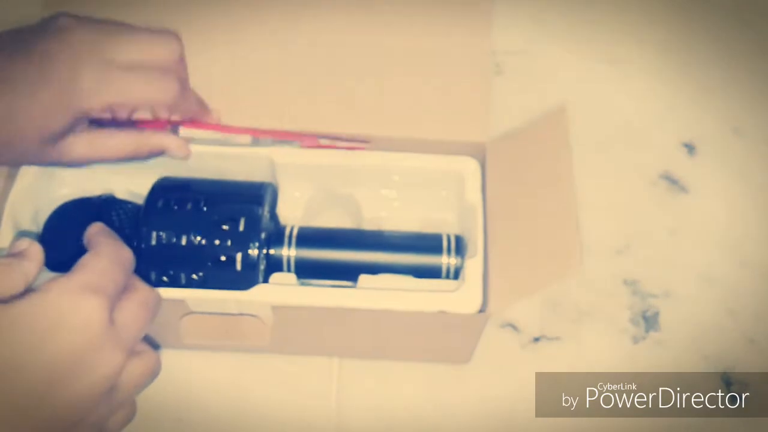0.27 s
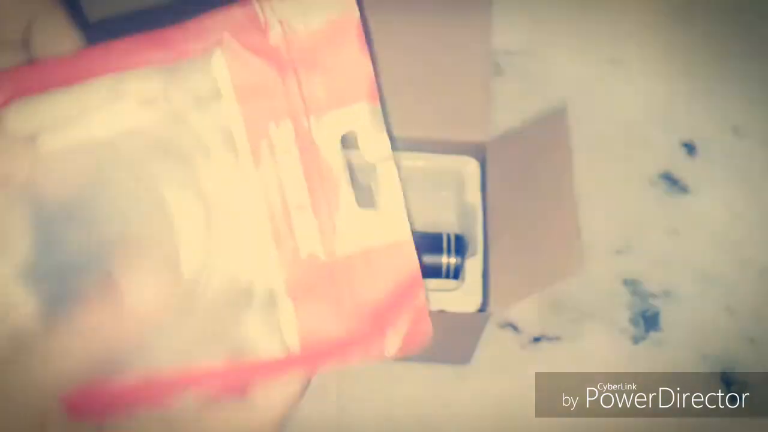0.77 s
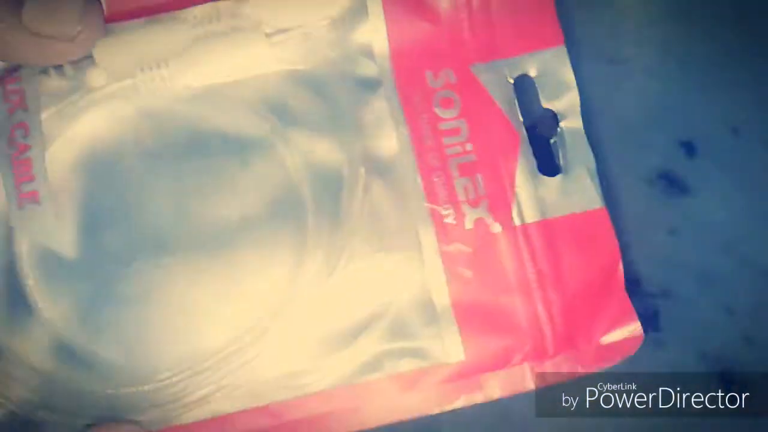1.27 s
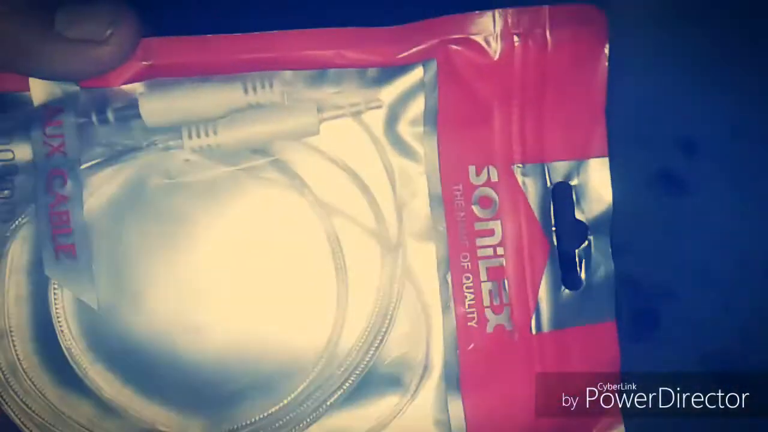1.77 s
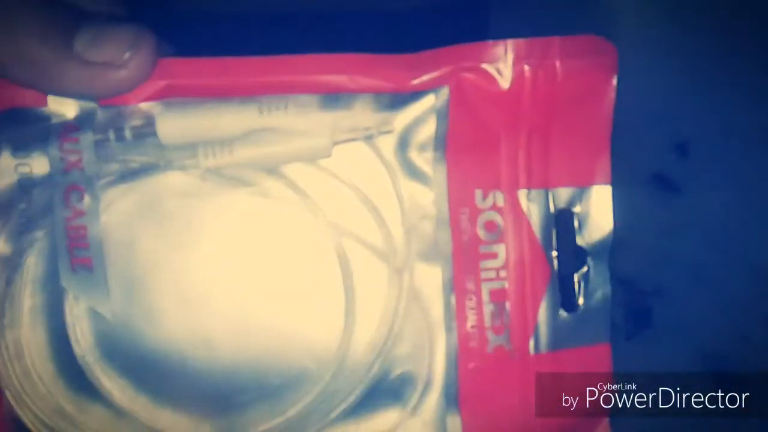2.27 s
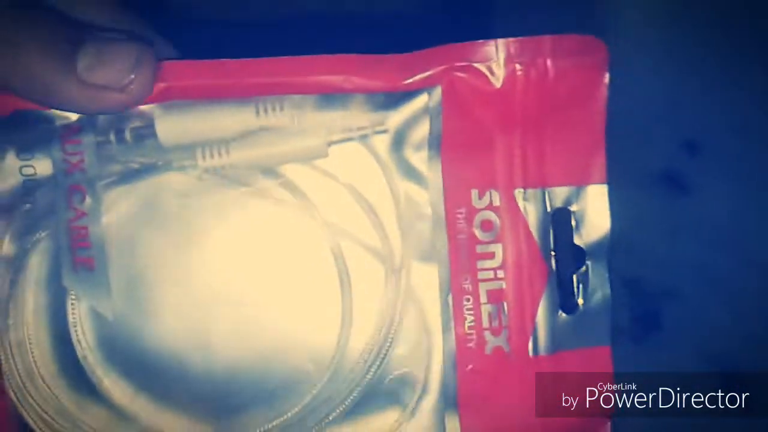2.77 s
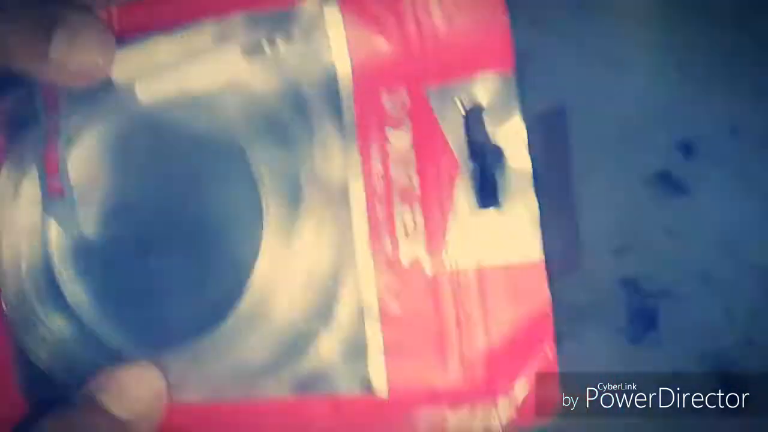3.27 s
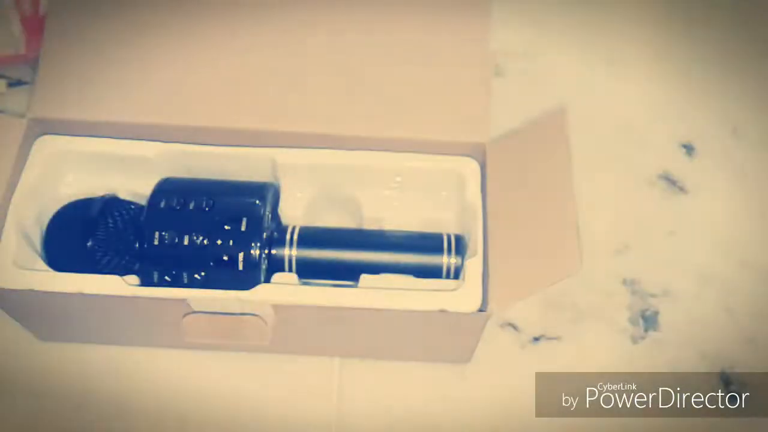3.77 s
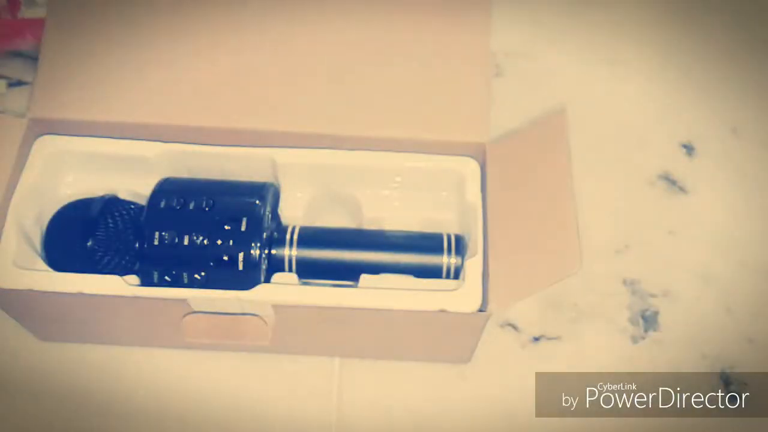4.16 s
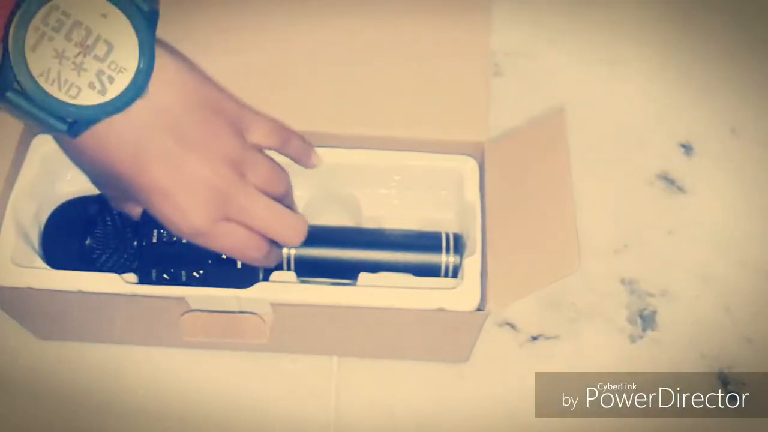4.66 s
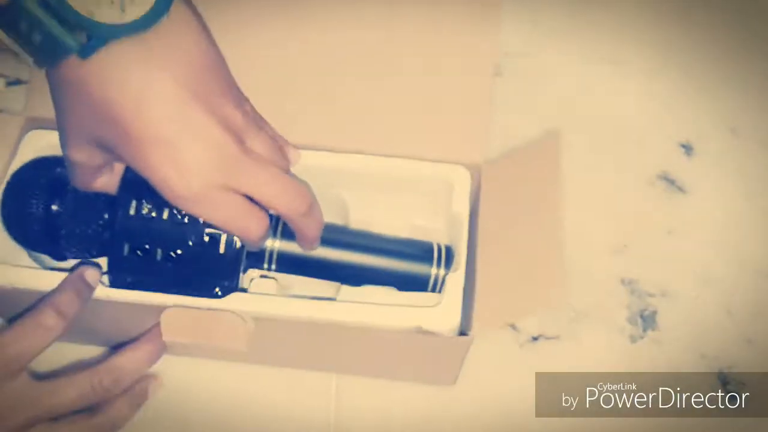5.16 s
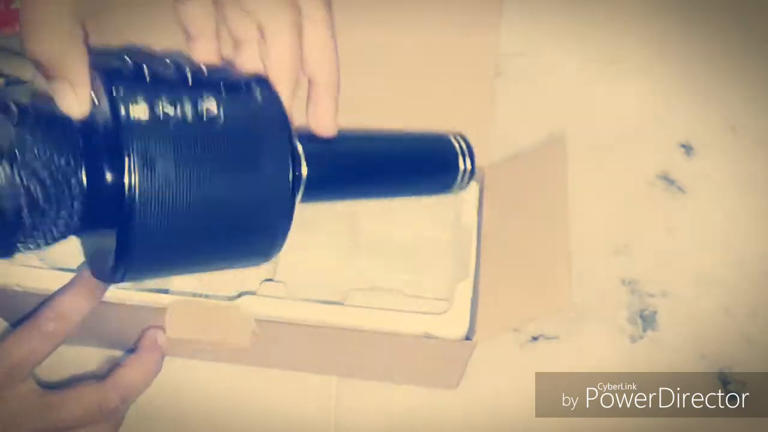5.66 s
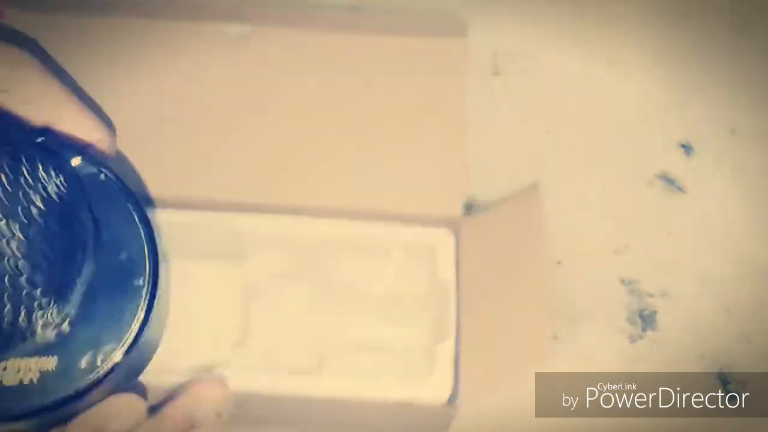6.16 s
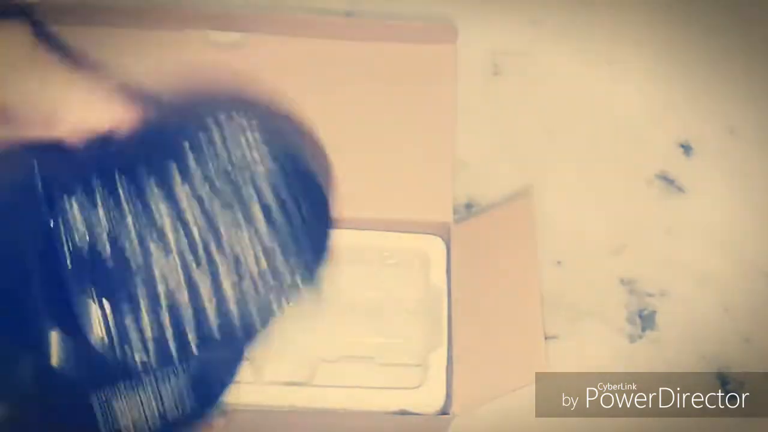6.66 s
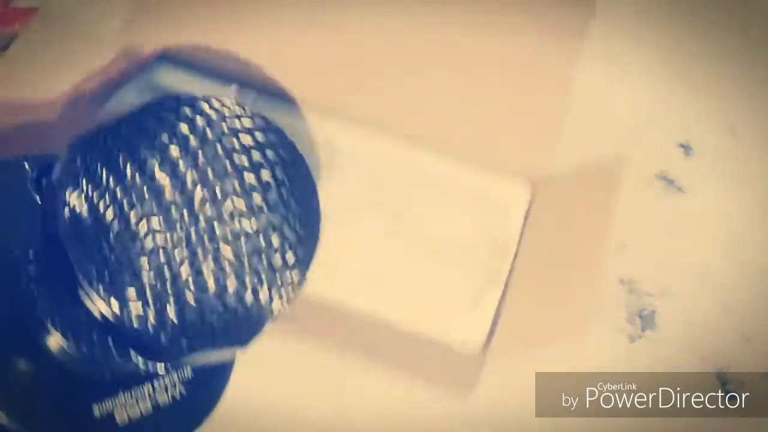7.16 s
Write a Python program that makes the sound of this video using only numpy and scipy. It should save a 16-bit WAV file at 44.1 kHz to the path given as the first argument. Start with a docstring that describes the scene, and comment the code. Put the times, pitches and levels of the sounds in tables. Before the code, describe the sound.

Close to a phone microphone in a small hard room, a double knock on a box leads into a papery slide and a sharp foil snap. A pouch crinkles and ticks, then nearly stops. After a few faint rustles, a handheld microphone drags roughly from its plastic tray, with clacks and crackles. The empty box drops with loud hollow knocks, is nudged, and scrapes over the stone floor.

```python
"""Unboxing on a stone floor, close to a phone: after a knock, a foil pouch slides off a cardboard lid (grainy noise).
Held up, it snaps and crinkles as it flexes: bright cracks, a few cycles of ringing panel, small pitched ticks.
A handheld microphone is pulled from its moulded plastic tray (coarser grains that set tray and box humming).
The box drops back, is nudged and scrapes along: struck modes of walls and tray, then rubbing noise.
Throughout, a small hard room answers with decaying noise, over a low rumble and a thin whine."""
import sys
import numpy as np
from scipy import signal
from scipy.fft import rfft, irfft, next_fast_len
from scipy.io import wavfile
from scipy.ndimage import map_coordinates

SR = 44100
rng = np.random.default_rng(int(sys.argv[2]) if len(sys.argv) > 2 else 0)


def inscribe(sig):
    """Save sig as 16-bit PCM at rate SR to the path in sys.argv[1].

    A 1-D sig is mono; a 2-D sig holds one channel per row.
    Samples are clipped to [-1, 1] before scaling.
    """
    pcm = np.round(np.clip(np.atleast_2d(sig).T, -1, 1) * 32767)
    wavfile.write(sys.argv[1], SR, pcm.astype(np.int16))


N = 327513  # samples
TOP_HZ = 15700  # upper band limit


def amp(db):
    """Decibels to gain."""
    return 10 ** (np.asarray(db) / 20)


def unit(x):
    """Scale to rms 1."""
    return x / np.sqrt(np.mean(x ** 2) + 1e-20)


def burst(x):
    """Scale to rms 1 over the first 10 ms."""
    return x / np.sqrt(np.mean(x[:SR // 100] ** 2) + 1e-20)


def along(points, hz):
    """Interpolate (Hz, value) points on a log frequency axis."""
    f, v = np.transpose(points)
    return np.interp(np.log(hz + 1), np.log(f + 1), v)


def wobble(knots_per_s):
    """Smooth random curve through Gaussian knots."""
    knots = rng.standard_normal(int(N * knots_per_s / SR) + 4)
    return map_coordinates(knots, [np.arange(N) * knots_per_s / SR])


def coloured(x, gain):
    """Causal minimum-phase filter of magnitude gain(Hz), by folding the cepstrum."""
    m = 2 * next_fast_len(len(x) // 2 + 4096)
    magnitude = np.maximum(gain(np.fft.rfftfreq(m, 1 / SR)), 1e-6)
    cepstrum = irfft(np.log(magnitude), m)
    cepstrum[1:m // 2] *= 2
    cepstrum[m // 2 + 1:] = 0
    response = np.exp(rfft(cepstrum, m))
    return irfft(rfft(x, m) * response, m)[:len(x)]


def high_pass(x, hz):
    """Second-order bass cut."""
    return signal.sosfilt(signal.butter(2, hz, "high", fs=SR, output="sos"), x)


def add(track, s, sound):
    """Mix a sound into a track at time s."""
    part = track[max(round(s * SR), 0):][:len(sound)]
    part += sound[:len(part)]


def ring(modes, t, scatter_db):
    """Damped modes (Hz, dB, t60 s); every strike draws new strengths and signs."""
    hz, db, t60 = np.transpose(modes)[:, :, None]
    chance = rng.standard_normal((2, len(modes), 1))
    size = np.sign(chance[0]) * amp(db + scatter_db * chance[1])
    decay = np.exp(-np.log(1000) * t / t60)
    return burst(np.sum(size * decay * np.sin(2 * np.pi * hz * t), axis=0))


# Spectrum of a contact crack. Each row: frequency in Hz, relative level in dB.
CRACK = [(1200, -43.5), (2600, 4), (4300, 2.5), (5600, 0.5), (7000, 2), (10000, -22), (15000, -23.5)]


def crack(t, t60, sharp_db, spike=4.8):
    """Bright spit of a contact, spike plus noise puff; a harder edge keeps more of the highest treble."""
    puff = rng.standard_normal(len(t)) * np.exp(-np.log(1000) * t / t60)
    puff[0] = spike
    edge = [(4000, 0.013), (7000, sharp_db)]  # Hz, dB
    return burst(coloured(puff, lambda hz: amp(along(CRACK, hz) + along(edge, hz))))


# Creases of foil and plastic snapping over.
# Each row: start in seconds, panel level in dB, panel pitch in Hz, crack level in dB, sharpness in dB.
SNAPS = [(.47, -37.5, 1290, -32, 2), (.7363, -43.5, 1310, -48.5, -3), (0.7453, -49, 760, -43, -7.5),
         (0.828, -50, 1090, -53, -2.5), (.939, -41, 760, -50.5, -15), (0.9517, -48.5, 2110, -38, -12),
         (0.9574, -49, 2160, -56, -8), (0.9683, -42, 530, -49.5, 7.5), (0.9796, -48.5, 650, -78, -10),
         (1.0031, -48.5, 1290, -49.5, -1), (1.057, -53, 1200, -58, -8.5), (1.1538, -43, 1810, -58, -8),
         (1.216, -63, 1130, -61.5, -3), (1.2416, -45, 1080, -52.5, -8.5), (1.2482, -47, 900, -64, -12),
         (1.351, -36.5, 1016, -56.5, -3.5), (1.3535, -39, 820, -56, 5), (1.3948, -55, 840, -84, -4),
         (1.4461, -49, 1230, -66, 1), (1.6194, -63, 2230, -58, -1.5), (1.7066, -43.5, 1770, -59.5, 4),
         (1.857, -44, 1170, -46.5, -21), (2.1421, -41.5, 1010, -50, -15), (3.2684, -54, 587, -73, -4),
         (3.3255, -36.5, 1820, -39, 10), (3.3815, -43.5, 1050, -58.5, 1), (3.9466, -60, 785, -61, 7),
         (4.0463, -57.5, 1210, -59, 6), (4.286, -61.5, 700, -65.5, 7), (4.864, -62, 696, -65, -4),
         (4.9276, -65, 526, -71, 8), (5.2146, -43, 740, -39, 4), (5.237, -52, 845, -45.5, -24.5),
         (5.348, -42, 2210, -36, -8), (6.6876, -78, 2240, -67, 5)]
# Overtones of a snapping panel. Each row: ratio to its pitch, relative level in dB.
PANEL = [(.55, -9), (1, 0.5), (1.451, -7), (2.15, -9)]


def snaps(panel_t60_s=0.012, push_hz=330, low_cut_hz=170):
    """A crease flips: a crack, a few cycles of the panel beside it, a small push of air."""
    push_db, push_db_per_octave = -7, -15.5  # push re panel at 1 kHz; smaller, higher panels push less
    out, t = np.zeros(N), np.arange(SR // 20) / SR
    for s, panel_db, hz, crack_db, sharp_db in SNAPS:
        modes = [(hz * ratio, db, panel_t60_s) for ratio, db in PANEL]
        air_db = panel_db + push_db + push_db_per_octave * np.log2(hz / 1000)
        add(out, s, amp(panel_db) * ring(modes, t, scatter_db=4.0))
        add(out, s, amp(air_db) * ring([(push_hz, 0, .012)], t, scatter_db=0))
        add(out, s, amp(crack_db) * crack(t, t60=0.012, sharp_db=sharp_db))
    return high_pass(out, low_cut_hz)  # small things radiate little bass


def swell(strokes, rise_db_per_s, fall_db_per_s, slow_stroke_s=0.13):
    """Each stroke rises, holds and dies away; one gain curve per level column."""
    now = np.arange(N) / SR
    power = np.zeros((len(strokes[0]) - 2, N))
    for s, held_s, *levels_db in strokes:
        rise = rise_db_per_s / (1 + held_s / slow_stroke_s)  # half the pace when held slow_stroke_s
        away_db = rise * np.maximum(s - now, 0) + fall_db_per_s * np.maximum(now - s - held_s, 0)
        heard = away_db < 60
        power[:, heard] += amp(np.array(levels_db)[:, None] - away_db[heard]) ** 2
    return np.sqrt(power)


def rub(gains, spectrum, catches_per_s, smooth, judder_db, stutter_db, split_hz=2000):
    """Friction: tiny catches of uneven size on a smooth hiss, juddering with the hand."""
    body_gain, hiss_gain = gains
    grains = (rng.random(N) < catches_per_s / SR) * rng.standard_normal(N)
    force = unit(grains) + smooth * rng.standard_normal(N)
    force = force * amp(judder_db * wobble(90))

    def low_share(hz):
        return 1 / (1 + (hz / split_hz) ** 6)

    low = unit(coloured(force, lambda hz: amp(along(spectrum, hz)) * np.sqrt(low_share(hz))))
    high = unit(coloured(force, lambda hz: amp(along(spectrum, hz)) * np.sqrt(1 - low_share(hz))))
    # the grip keeps shifting, separately in each band
    low = unit(low * amp(stutter_db * wobble(35)))
    high = unit(high * amp(stutter_db * wobble(35)))
    return low * body_gain + high * hiss_gain


def crinkle(gains, per_s, crinkle_db, centre_hz=3800, spread=0.53, size_db=4, cycles=5):
    """Little creases give way at random, each with its own pitch, as strongly as the sheet is rubbed."""
    _, hiss_gain = gains
    out, t = np.zeros(N), np.arange(SR // 100) / SR
    starts = np.flatnonzero((rng.random(N) < per_s / SR) & (hiss_gain > 0))
    chances = np.clip(rng.standard_normal((len(starts), 2)), -2, 2)
    for at, (pitch, size) in zip(starts, chances):
        hz = min(centre_hz * np.exp(spread * pitch), TOP_HZ)
        tick = np.sin(2 * np.pi * hz * t) * np.exp(-2 * hz * t / cycles)
        add(out, at / SR, hiss_gain[at] * amp(crinkle_db + size_db * size) * tick)
    return out


# Colour of rubbed foil. Each row: frequency in Hz, relative density in dB per Hz.
POUCH = [(59, -55.5), (100, 1), (530, 3), (1160, -5), (1840, -3), (2180, 0.5), (2320, -1.5), (3120, -1),
         (3390, -2), (4660, 0), (5630, -4), (6950, -1), (9150, -16.5), (11500, -14), (15500, -20.5)]
# Pouch strokes. Each row: full speed reached in seconds, hold in seconds, body level in dB, hiss level in dB.
POUCH_STROKES = [(.465, 0.027, -46.5, -48.5), (.532, 0.016, -43, -46), (.575, 0.07, -52, -49.5),
                 (.72, 0.061, -58.5, -62.5), (.835, 0.026, -59, -62), (.96, .012, -44.5, -47),
                 (1.148, .008, -59, -63), (1.24, 0.006, -58, -66), (1.295, .045, -53, -59),
                 (1.42, .56, -69, -76.5), (3.1, 0.45, -83, -77.5), (3.335, 0.064, -62, -71),
                 (3.68, 0.22, -73, -70), (3.84, 0.023, -56, -59.5), (3.92, 0.16, -59, -64),
                 (4.13, 0.038, -63, -70), (4.24, 0.26, -71, -78)]


def pouch_slide():
    """Foil friction, fine-grained, and the crinkles it sets off; returns both."""
    gains = swell(POUCH_STROKES, rise_db_per_s=850, fall_db_per_s=540)
    friction = rub(gains, POUCH, catches_per_s=2000, smooth=0.65, judder_db=2.54, stutter_db=1.9)
    return friction, crinkle(gains, per_s=180, crinkle_db=7.5)


# Colour of the rubbed lid. Each row: frequency in Hz, relative density in dB per Hz.
LID = [(59, -51), (100, -14.5), (264, -6.5), (403, -15), (497, 2), (541, -12.5), (774, -4.5), (1110, -8.5),
       (1460, 1), (1920, -17.5), (2270, -12), (2870, -19.5), (6810, -24.5), (8770, -45.5), (15500, -45)]
# Lid strokes. Each row: full speed reached in seconds, hold in seconds, body level in dB, hiss level in dB.
LID_STROKES = [(.115, .05, -59, -62.5), (.212, 0.022, -40.5, -44.5), (.285, 0.033, -38.5, -40),
               (.41, .02, -57, -50.5)]


def lid_slide():
    """Friction on the cardboard lid, with weak crinkles; returns both."""
    gains = swell(LID_STROKES, rise_db_per_s=500, fall_db_per_s=280)
    friction = rub(gains, LID, catches_per_s=1200, smooth=1.0, judder_db=2.5, stutter_db=0.45)
    return friction, crinkle(gains, per_s=180, crinkle_db=-1.5)


# Colour of the rubbed tray. Each row: frequency in Hz, relative density in dB per Hz.
TRAY = [(59, -25), (100, -10), (188, 2), (589, 0.5), (682, 3), (898, 5.5), (1230, -4), (1660, -4.5),
        (2040, -13.5), (2630, -14.5), (5400, -23), (6950, -22), (9740, -40.5), (12800, -37.5),
        (15500, -40.5)]
# Tray strokes. Each row: full speed reached in seconds, hold in seconds, body level in dB, hiss level in dB.
TRAY_STROKES = [(4.64, 0.046, -62, -67.5), (4.75, 0.0038, -56.5, -84), (4.95, 0.21, -55, -62.5),
                (5.17, 0.24, -46, -50.5), (5.24, 0.01, -48, -42.5), (5.45, 0.009, -41, -38.5),
                (5.53, 0.098, -46.5, -48), (5.61, 0.028, -45.5, -48), (5.68, 0.03, -51.5, -59.5),
                (5.77, 0.077, -64.5, -70.5), (6.6, 0.2, -71.5, -75.5)]


def tray_pull():
    """Coarse plastic friction as the microphone leaves its tray, with crinkles; returns both."""
    gains = swell(TRAY_STROKES, rise_db_per_s=470, fall_db_per_s=380)
    friction = rub(gains, TRAY, catches_per_s=600, smooth=0.89, judder_db=2.0, stutter_db=1.5)
    return friction, crinkle(gains, per_s=95, crinkle_db=2)


# Fingers on the smooth handle. Each row: full speed reached in seconds, hold in seconds, level in dB.
GLIDES = [(4.735, 0.022, -60.5), (5.74, 0.11, -62.5)]


def glide(centre_hz=4300, width=0.19):
    """Skin on smooth plastic: a narrow, airy swish."""
    noise = rng.standard_normal(N)
    swish = unit(coloured(noise, lambda hz: 1 / (1 + (np.log((hz + 1) / centre_hz) / width) ** 2)))
    return swish * swell(GLIDES, rise_db_per_s=770, fall_db_per_s=1800)[0]


# Blows on box and tray, levels before the trims below.
# Each row: start in seconds, thud level in dB, clack level in dB, crack level in dB.
KNOCKS = [(0.0681, -29, -36.5, -58), (0.0762, -31, -33.5, -50), (0.6623, -42.5, -47, -53),
          (3.8216, -40.5, -43, -44), (4.6521, -47, -44.5, -78.5), (4.7499, -51, -54, -57.5),
          (5.0653, -53, -45.5, -74), (5.1483, -39, -53, -55), (5.2646, -37, -54, -65),
          (5.334, -39, -54, -68), (5.4219, -50, -47, -49), (5.4643, -33.5, -30.5, -39),
          (5.5463, -49, -50, -51), (6.1526, -28.5, -25, -39), (6.1656, -31, -30.5, -58),
          (6.218, -29.5, -45, -51), (6.2504, -31.5, -28.5, -43), (6.9362, -40.5, -46, -59.5),
          (7.066, -48.5, -60, -68), (7.1241, -33, -35.5, -55.5), (7.189, -55, -50, -61)]
# Modes of the cardboard walls. Each row: frequency in Hz, relative level in dB, t60 in seconds.
WALLS = [(92, -8.5, 0.12), (169, -6, 0.17), (176, 4, 0.051), (249, 4, 0.059), (300.4, -11, 0.11),
         (377.2, 0, 0.066), (426.3, -6, 0.13), (497.6, -3.5, 0.065)]
# Modes of the tray. Each row: frequency in Hz, relative level in dB, t60 in seconds.
SHELL = [(625, -3, 0.081), (730, -2.5, 0.035), (759.5, -7, 0.073), (831, 3.5, 0.049), (936, -3, 0.01),
         (1162, 7.5, 0.014), (1337, -7.5, 0.078), (1458, -4.5, 0.035), (1900, -10, .05),
         (2257, -9.5, 0.035)]


def knocks(thud_db=-1, clack_db=-3, shell_db=-4, crack_db=-1, low_cut_hz=95):
    """A blow rings the cardboard walls, the whole tray and, briefly, the spot that is hit."""
    spot_hz, spot_spread = 821, .08  # pitch of the spot, and its log scatter from blow to blow
    out, t = np.zeros(N), np.arange(SR // 5) / SR
    give = 1 - np.exp(-t / 0.00027)  # the soft walls take a moment to get moving
    for s, thud, clack, spit in KNOCKS:
        hz = spot_hz * np.exp(spot_spread * rng.standard_normal())
        spot = [(hz, 0, .018), (hz * 2.6, -7, .008)]
        add(out, s, amp(thud + thud_db) * give * ring(WALLS, t, scatter_db=2.0))
        add(out, s, amp(clack + shell_db) * ring(SHELL, t, scatter_db=3.0))
        add(out, s, amp(clack + clack_db) * ring(spot, t, scatter_db=3.5))
        add(out, s, amp(spit + crack_db) * crack(t, t60=0.028, sharp_db=-5.5))
    return high_pass(out, low_cut_hz)  # small things radiate little bass


# Colour of the scraping box. Each row: frequency in Hz, relative density in dB per Hz.
BOX = [(59, -28), (100, -9), (173, -4), (287, -2), (420, -3.5), (541, -8), (697, -0.5), (977, -2),
       (2000, -15), (2630, -14), (3850, -20.5), (6810, -17), (8770, -28.5), (14500, -28.5), (15500, -28)]
# Box strokes. Each row: full speed reached in seconds, hold in seconds, body level in dB, hiss level in dB.
BOX_STROKES = [(6.178, 0.0088, -36, -49.5), (6.24, .075, -48, -49), (6.96, 0.063, -66.5, -79),
               (7.06, .04, -59, -65.5), (7.122, 0.12, -55, -56), (7.22, .2, -56.5, -48),
               (7.28, 0.055, -54.5, -47.5)]


def box_scrape():
    """Dense, even friction of the box on the floor."""
    gains = swell(BOX_STROKES, rise_db_per_s=1150, fall_db_per_s=260)
    return rub(gains, BOX, catches_per_s=3000, smooth=1.0, judder_db=0.7, stutter_db=0.9)


def resonate(x, modes):
    """What the modes (Hz, dB, t60 s) sing when x drives them."""
    out = np.zeros(N)
    for hz, db, t60 in modes:
        width_hz = np.log(1000) / (np.pi * t60)
        out += amp(db) * signal.lfilter(*signal.iirpeak(hz, hz / width_hz, SR), x)
    return out


def hum(scrape, walls_db=-6.5, shell_db=-13.5):
    """Scraping drives the modes of walls and tray."""
    return amp(walls_db) * resonate(scrape, WALLS) + amp(shell_db) * resonate(scrape, SHELL)


# Soft handling bumps. Each row: centre in seconds, envelope peak in dB, frequency in Hz.
BUMPS = [(.340, -52, 75), (.390, -38.5, 80), (.521, -45.5, 78), (0.751, -37.5, 95), (5.151, -44.5, 95),
         (5.225, -44.5, 88)]


def bumps(half_width_s=0.0045):
    """A cycle or two of low pressure from the hands, under a Gaussian envelope."""
    out, now = np.zeros(N), np.arange(N) / SR
    for s, db, hz in BUMPS:
        t = now - s
        out += amp(db) * np.sin(2 * np.pi * hz * t) * np.exp(-(t / half_width_s) ** 2 / 2)
    return out


# Room decay. Each row: frequency in Hz, t60 in seconds.
ROOM = [(150, 0.84), (800, 0.74), (2500, 0.75), (7000, 0.51), (14000, 0.53)]


def room(x, build_up_s=0.01):
    """Diffuse answer of the walls: a fresh noise tail, each frequency dying at its own speed."""
    hz, t, z = signal.stft(rng.standard_normal(SR), SR, nperseg=256)
    decay = np.exp(-np.log(1000) * t / along(ROOM, hz)[:, None])
    tail = signal.istft(z * decay, SR, nperseg=256)[1]
    tail = tail * np.clip(np.arange(len(tail)) / SR / build_up_s, 0, 1) ** 2
    return signal.fftconvolve(x, tail / np.linalg.norm(tail))[:N]


# Colour of the room rumble. Each row: frequency in Hz, relative density in dB per Hz.
RUMBLE = [(15, -52.5), (25, -21), (37, -28.5), (69, -8.5), (133, -5.5), (160, -9), (221, -11), (260, -18),
          (305, -11.5), (349, -20.5), (445, -19), (919, -27.5), (1170, -25), (1400, -30), (2600, -31),
          (6000, -47.5), (15500, -52.5)]


def background(rumble_db=-64, whine_db=-80, whine_hz=1200):
    """Room noise, its level wavering slightly, with a thin electrical whine."""
    noise = unit(coloured(rng.standard_normal(N), lambda hz: amp(along(RUMBLE, hz))))
    whine = np.sqrt(2) * np.sin(2 * np.pi * whine_hz * np.arange(N) / SR)
    return amp(rumble_db + 0.92 * wobble(7)) * noise + amp(whine_db) * whine


# Colour of the channel hiss. Each row: frequency in Hz, relative density in dB per Hz.
SELF_NOISE = [(24, -45.5), (40, -16.5), (160, -1.5), (466, 0.5), (514, -0.5), (2520, -12), (6460, -29.5),
              (15000, -26)]


def stereo(mid, hiss_db=-78):
    """Both channels carry the same scene; a faint steady hiss enters them in opposite polarity."""
    hiss = unit(coloured(rng.standard_normal(N), lambda hz: amp(along(SELF_NOISE, hz))))
    side = amp(hiss_db) * hiss
    return np.array([mid + side, mid - side])


def scene():
    """Mix the sources; blows stir the room most, snaps and crinkles least."""
    pouch, pouch_creases = pouch_slide()
    lid, lid_creases = lid_slide()
    tray, tray_creases = tray_pull()
    box = box_scrape()
    rubs = pouch + lid + tray + box + hum(tray + box) + glide()
    creases = pouch_creases + tray_creases + lid_creases
    near, blows = snaps() + creases, knocks()
    spread = snaps(panel_t60_s=0.004) + creases  # heard from all sides, a snap has little pitch
    # each place in the room has its own echo
    echo = room(amp(-11.5) * rubs) + room(amp(-17) * spread) + room(amp(-8.5) * blows)
    return stereo(rubs + near + blows + bumps() + echo + background())


# Response of the phone's sound port. Each row: frequency in Hz, gain in dB.
PORT = [(5500, -1), (6300, -1), (7000, 2), (7700, -2.5), (8600, -5), (10000, -0.5), (12000, 5), (15500, 6)]


def record(dry, low_cut_hz=45, offset=-0.00047):
    """A resonant sound port, a bass cut, a steep band limit and a small steady offset."""
    heard = np.array([coloured(channel, lambda hz: amp(along(PORT, hz))) for channel in dry])
    heard = high_pass(heard, low_cut_hz)
    m = next_fast_len(N + SR // 2)
    passed = np.fft.rfftfreq(m, 1 / SR) < TOP_HZ
    return irfft(rfft(heard, m) * passed, m)[:, :N] + offset


dry = scene()
out = record(dry)
inscribe(out)
```